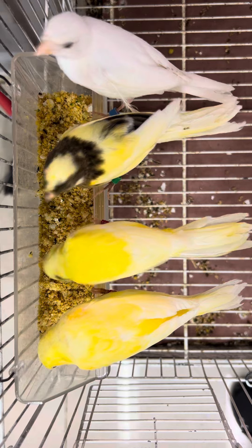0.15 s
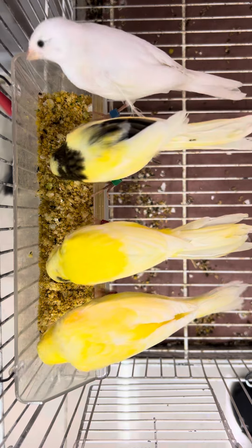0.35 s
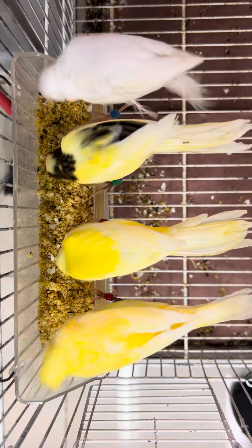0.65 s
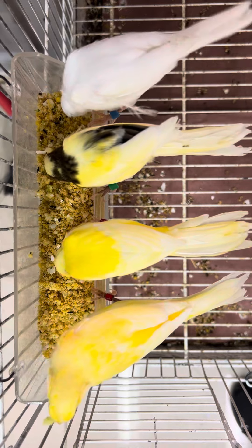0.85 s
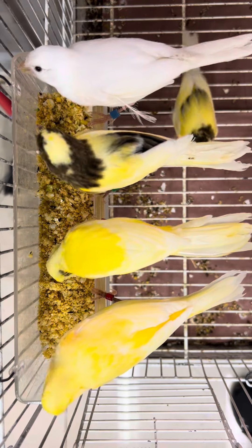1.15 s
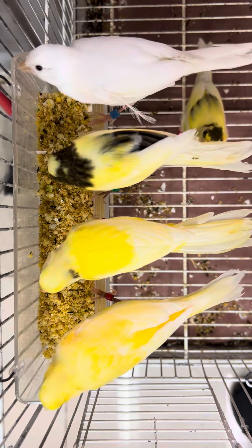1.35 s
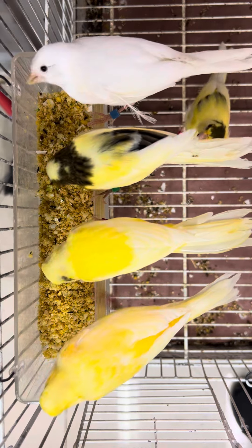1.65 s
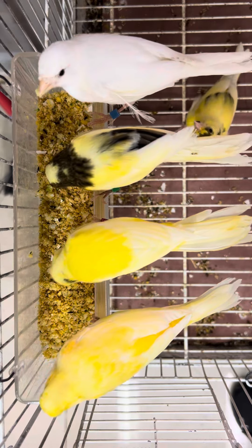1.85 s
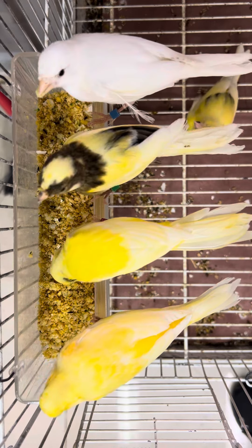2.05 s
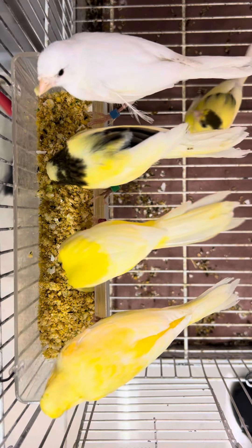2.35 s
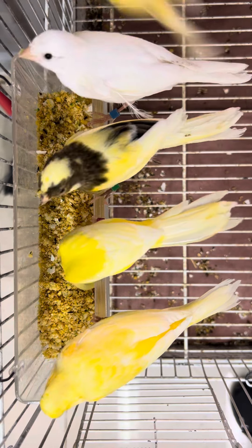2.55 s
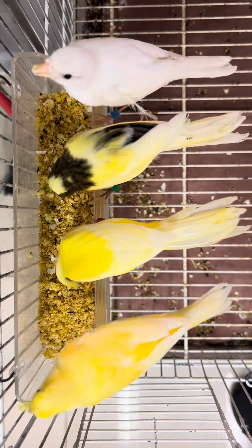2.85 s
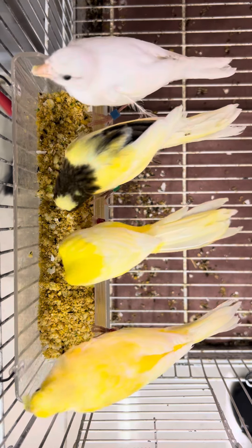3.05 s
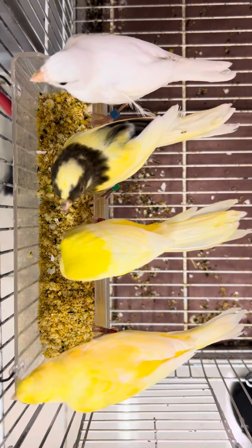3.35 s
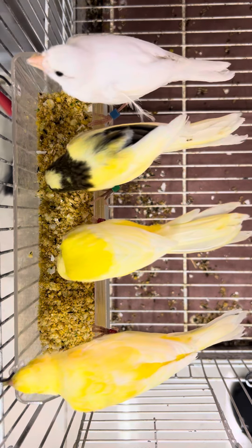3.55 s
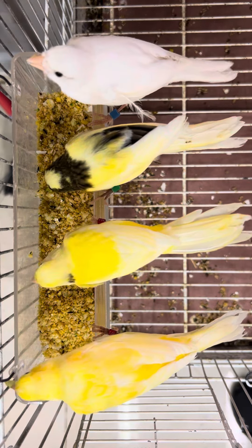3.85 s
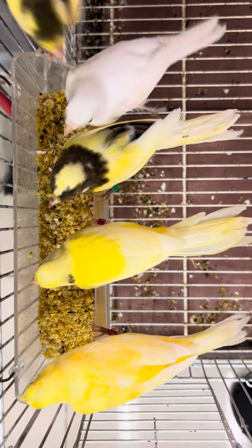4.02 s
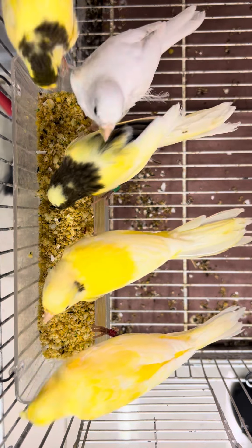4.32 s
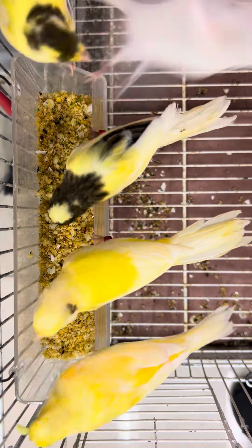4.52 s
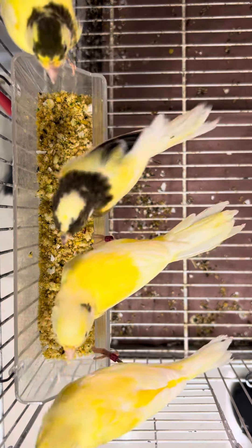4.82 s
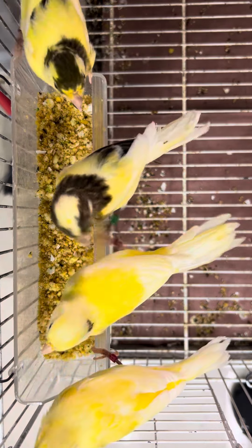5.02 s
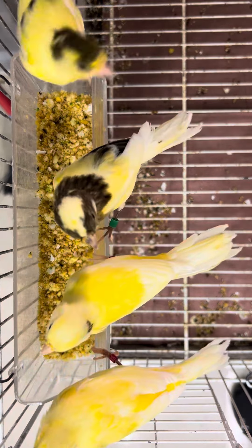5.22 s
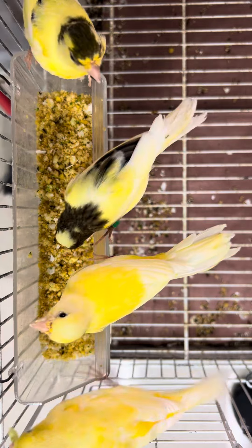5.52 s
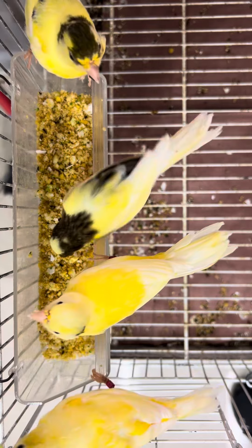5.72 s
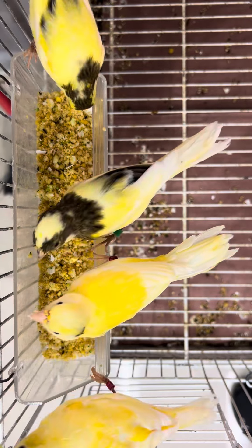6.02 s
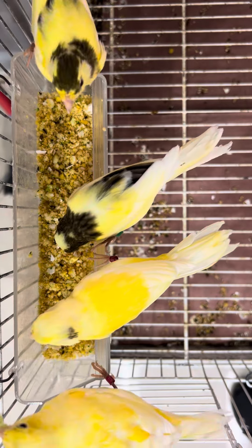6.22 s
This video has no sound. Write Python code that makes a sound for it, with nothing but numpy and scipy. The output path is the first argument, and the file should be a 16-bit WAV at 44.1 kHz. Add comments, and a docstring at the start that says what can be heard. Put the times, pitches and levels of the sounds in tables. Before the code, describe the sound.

Several canaries trill, chirp and buzz over one another in a small lively room, with wire cage rattles and a low appliance hum.

```python
"""Canaries sing over one another in a small, lively room, above an appliance's hum and far-off chirping.
First come chirps, buzzes, whistles and a far bird's peeps, and jolts soon begin to rattle the wire cage.
After a second one bird rolls rising sweeps that slow down and sink; near the end of these come close squeaks.
Then it rolls falling sweeps while feet shuffle on the wires, and a last jolt comes near the end.
Voices are gliding near-sines, knocks are bursts of noise, the wires are resonators, and echoes are added."""
import sys
import numpy as np
from scipy import signal
from scipy.fft import rfft, irfft
from scipy.io import wavfile
from scipy.ndimage import uniform_filter1d

SR = 44100
rng = np.random.default_rng(int(sys.argv[2]) if len(sys.argv) > 2 else 0)


def int16_out(signal):
    """Quantize to a 16-bit WAV file."""
    q = np.round(np.clip(np.atleast_2d(signal).T, -1, 1) * 32767)
    wavfile.write(sys.argv[1], SR, q.astype(np.int16))


N = 281358

# In all tables, levels are starting points that the sound functions shape further.
# Left-right is how much louder the left side is.
# room air, loudness over pitch: (frequency [Hz], relative level [dB per Hz])
AIR_SPECTRUM = [(22, -46), (32, -13.5), (60, 3.5), (91, -3.5), (173, -10), (421, -12), (700, -22.5),
                (1490, -30.5), (3000, -35), (6000, -40), (10000, -44), (15000, -87)]
# how wide the air sounds: (frequency [Hz], side against middle [dB])
AIR_WIDTH = [(60, -36), (125, -23), (250, -16), (500, -6.5), (1000, -3), (12000, -26)]
# narrow bands of the motor's hum: (centre [Hz], width [Hz], level [dB])
HUM_BANDS = [(80.9, 6.8, -36), (146.1, 2.8, -48.5), (221.8, 51, -48)]
# a far bird repeats one note: (time [s], level [dB])
FAR_PEEPS = [(0.076, -49), (.95, -46), (1.08, -49), (1.219, -47.5), (1.371, -45.5), (1.52, -46),
             (1.691, -44.5), (1.835, -45)]
# the cage is jolted: (time [s], level [dB], relative brightness [dB], rattle fade time [s])
CAGE_JOLTS = [(0.494, -21.5, -1.5, 0.0082), (0.562, -17.5, -11, 0.0058), (.702, -24, -3, 0.0033),
              (1.858, -18.5, -1, 0.0082), (4.086, -18.5, -34, 0.012), (4.205, -29, -22, 0.011),
              (4.46, -20, 0.5, 0.0084), (4.589, -31.5, -5, 0.027), (4.769, -25.5, -31, 0.01),
              (4.847, -35.5, -0.5, 0.036), (4.981, -25.5, -14, 0.0041), (5.112, -35, -3, 0.037),
              (6.318, -17.5, -9, 0.0053)]
# ringing cage wires: (pitch [Hz], level [dB], time to fade by 60 dB [s])
CAGE_WIRES = [(1046, -33.5, 0.15), (1140, -26.5, .08), (1253, -25.5, 0.096), (1400, -30, 0.055),
              (1550, -34.5, 0.097), (1737, -38, 0.058), (2010, -36, 0.17), (2280, -36, 0.087)]
# husks crack: (time [s], level [dB])
HUSK_CRACKS = [(2.673, -25.5), (3.203, -51), (3.434, -41), (4.3, -40)]
# harsh scolds and a rustle of feathers: (time [s], length [s], centre [Hz], width [Hz], level [dB])
SCOLDS = [(2.498, 0.042, 6470, 1220, -18.5), (6.035, 0.057, 6360, 1650, -23),
          (0.287, 0.025, 5200, 10000, -37.5)]
# wings beat the tray: (time [s], length [s], centre [Hz], width [Hz], level [dB])
WING_THUMPS = [(2.277, 0.11, 537, 287, -32), (3.708, 0.019, 990, 600, -42)]
# close squeaks: (time [s], length [s], edge pitch [Hz], top pitch [Hz], level [dB], left-right [dB])
SQUEAKS = [(3.891, 0.018, 1962, 2203, -19.5, 3), (4.061, 0.026, 1650, 3106, -14.5, 0.5),
           (4.46, 0.038, 2115, 3030, -20.5, 0)]
# strength of a squeak's harmonics, starting with the lowest: (level [dB])
SQUEAK_HARMONICS = [-10, -3, -14.5, -19.5]
# calls on both sides of the syrinx, the bird's voice box:
# (time [s], upper voice [Hz], sag of the lower voice [Hz], level [dB])
TWO_VOICED_CALLS = [(0.535, 6466, 406, -33.5), (1.454, 6590, 197, -33.5), (2.343, 6550, 39.8, -32),
                    (2.964, 6710, 147, -30.5), (4.424, 6510, 214, -31), (6.204, 6510, 446, -28)]
# raspy notes, mostly in short runs: (time [s], length [s], pitch [Hz], roughness [0-1], level [dB])
BUZZES = [(0.099, 0.079, 3395, 0.34, -47), (0.743, 0.021, 3810, 0.62, -31),
          (0.787, 0.014, 3770, 0.59, -27.5), (0.836, 0.026, 3796, 0.52, -26.5),
          (0.886, 0.019, 3793, 0.55, -30.5), (1.046, 0.012, 2846, 0.7, -43),
          (1.072, 0.039, 3435, 0.3, -32.5), (1.152, 0.014, 3476, 0.34, -26.5),
          (1.196, 0.016, 3730, 0.36, -30), (1.242, 0.025, 3630, 0.56, -32.5),
          (1.293, 0.021, 3600, 0.38, -31.5), (1.339, 0.037, 3546, 0.28, -32),
          (1.409, 0.025, 3640, 0.4, -30), (1.451, 0.012, 3594, 0.36, -32.5),
          (1.508, 0.044, 3306, 0.63, -35.5), (1.573, 0.049, 3785, 0.34, -38),
          (2.242, 0.016, 4680, 0.5, -31), (2.294, 0.048, 4730, 0.48, -32), (2.358, 0.029, 4580, 0.7, -27),
          (2.402, 0.038, 4780, 0.7, -31.5), (2.483, 0.025, 4714, 0.74, -26),
          (2.885, 0.031, 3590, 0.48, -28.5), (2.931, 0.026, 3825, 0.34, -26.5),
          (2.979, 0.014, 3595, 0.36, -31), (3.064, 0.022, 3550, 0.5, -29), (3.122, 0.01, 3600, 0.3, -28),
          (3.879, 0.018, 4746, 0.52, -30), (3.929, 0.034, 3486, 0.52, -30.5),
          (3.993, 0.016, 3610, 0.5, -30.5), (4.028, 0.032, 3718, 0.57, -30.5),
          (4.072, 0.012, 3864, 0.28, -26), (4.106, 0.057, 3846, 0.24, -31.5),
          (5.092, 0.027, 5770, 0.66, -52), (5.211, 0.042, 5065, 0.2, -31), (5.286, 0.015, 5540, 0.35, -38),
          (5.296, 0.028, 4710, 0.43, -31.5), (5.332, 0.041, 4810, 0.67, -32.5),
          (5.39, 0.023, 3330, 0.26, -41), (5.406, 0.019, 5390, 0.5, -35), (5.454, 0.038, 5090, 0.6, -41.5),
          (5.537, 0.03, 5200, 0.96, -35)]
# single chirps from all sides: (time [s], length [s], pitch [Hz], level [dB], left-right [dB])
SINGLE_CHIRPS = [(0.026, 0.026, 2120, -43, -2), (0.073, 0.015, 5490, -37, 2), (0.08, 0.014, 2710, -43.5, 0),
                 (0.218, 0.018, 2090, -50, 0), (0.278, 0.014, 2820, -46, 1), (.346, 0.011, 4540, -36, 0),
                 (0.348, 0.032, 2540, -50, 1), (0.415, 0.053, 2090, -50.5, 2), (1.485, 0.02, 4210, -28, 4),
                 (2.98, 0.048, 2608, -35.5, 1), (3.83, 0.031, 5580, -41.5, 2),
                 (0.859, 0.023, 5180, -39.5, 1), (2.09, 0.025, 5160, -30.5, 7),
                 (2.98, 0.015, 4870, -30.5, -2), (1.859, .025, 4430, -33, 0),
                 (2.233, 0.021, 5320, -28.5, -1), (2.296, .03, 5900, -44, 0), (2.597, 0.044, 5250, -36, -1),
                 (2.705, 0.12, 3350, -40, 1), (4.142, 0.035, 4864, -32.5, -2), (4.397, 0.04, 4765, -33, 2),
                 (5.191, 0.044, 4795, -32, 0)]
# chirps with a fainter upper voice just behind: (time [s], pitch [Hz], level [dB])
DOUBLE_CHIRPS = [(0.052, 4504, -33.5), (0.185, 4603, -25), (0.326, 4610, -29), (0.465, 4580, -27),
                 (0.984, 4710, -32), (3.261, 4526, -31), (3.416, 4560, -27.5), (5.826, 4330, -31.5)]
# held whistles: (time [s], length [s], pitch [Hz], level [dB], left-right [dB])
HELD_WHISTLES = [(.557, .138, 3470, -35.5, 1.2), (.986, .048, 2050, -47.8, 0),
                 (1.558, .088, 2370, -44.1, -2.7), (1.995, .225, 2775, -37, 5.8),
                 (2.575, .208, 2780, -38, 4.8), (3.86, .13, 2320, -42.1, 1.4),
                 (4.091, .058, 2565, -34.7, .7), (4.583, .188, 2780, -35.5, 5),
                 (5.154, .208, 2775, -35.5, 5.5)]
# a three-note tune:
# (delay [s], length [s], first pitch [Hz], last pitch [Hz], level [dB], left-right [dB])
TUNE_NOTES = [(0, .185, 2040, 2095, -42.5, .3), (.3, .214, 2440, 2435, -38, -3),
              (.544, .09, 2565, 2535, -44, 2)]
# when the tune is sung: (time [s])
TUNE_STARTS = [3.19, 5.661]
# falling sweeps onto one low note: (time [s], length [s], level [dB])
FALLING_SWEEPS = [(4.485, 0.025, -20.5), (4.575, 0.042, -17.5), (4.683, 0.043, -16.5), (4.788, 0.043, -19),
                  (4.901, 0.033, -19), (5.004, 0.047, -18), (5.113, 0.049, -22), (5.219, 0.047, -20),
                  (5.319, 0.054, -20), (5.442, .051, -20.5), (5.589, 0.11, -22.5), (5.778, 0.14, -21.5),
                  (5.99, 0.12, -21), (6.193, 0.11, -23)]
# rising sweeps of the same bird: (time [s], top pitch [Hz], level [dB])
RISING_SWEEPS = [(1.115, 5180, -27.5), (1.184, 5130, -30), (1.251, 5145, -26), (1.317, 5010, -29.5),
                 (1.386, 5025, -26.5), (1.452, 4965, -27.5), (1.521, 4940, -33), (1.594, 4905, -29.5),
                 (1.673, 5080, -27.5), (1.752, 4910, -28.5), (1.824, 4914, -26.5), (1.904, 4835, -24.5),
                 (1.992, 4830, -22.5), (2.089, 4894, -20.5), (2.221, 4807, -21.5), (2.366, 4816, -22.5),
                 (2.503, 4780, -21), (2.657, 4714, -24.5), (2.801, 4704, -22.5), (2.915, 4490, -26),
                 (3.069, 4468, -23), (3.271, 4158, -21), (3.529, 4286, -24), (3.755, 4203, -19),
                 (4.061, 4145, -24), (4.312, 4090, -22.5)]
# how the rising sweeps drift:
# (time [s], first pitch [Hz], bend exponent [-], share of the length spent gliding [-])
RISING_DRIFT = [(1.099, 4230, 0.67, 0.78), (1.3, 3890, 0.63, 0.38), (1.549, 3590, 0.53, 0.67),
                (2.1, 3464, 0.81, 0.59), (2.8, 3390, 0.63, 0.66), (3.07, 3500, 0.94, 0.36),
                (3.268, 3510, 0.58, 0.87), (3.519, 3150, 0.81, 0.82), (4.351, 3480, 0.79, 0.64)]
# phase shift between left and right over pitch: (frequency [Hz], lead of the left [rad])
LEFT_RIGHT_PHASE = [(3600, 0), (4400, 0.25), (5300, -1.48), (6500, -1), (11000, -1.11), (15500, -1.8)]

CHIRP_BEND = 0.8  # exponent of the glide; below 1 it moves fastest at the start
CAGE_PAN_DB = -0.5


def amp(db):
    """Turn decibels into a plain multiplier."""
    return 10 ** (np.asarray(db) / 20)


def rms_one(x):
    """Scale a sound to an average (RMS) strength of 1."""
    return x / np.sqrt(np.mean(x ** 2) + 1e-20)


def at_hz(points, hz):
    """Read a curve between its points, on a log-frequency axis."""
    point_hz, values = np.array(points).T
    return np.interp(np.log(hz), np.log(point_hz), values)


def spectrum_hz():
    """List the frequencies of a full-length spectrum, with no value below 1 Hz."""
    return np.maximum(np.arange(N // 2 + 1) * SR / N, 1)


def add(track, s, sound, pan_db):
    """Mix a sound into a stereo track; half the pan lifts the left, half lowers the right."""
    at = round(s * SR)
    sound = sound[:N - at]
    track[:, at:at + len(sound)] += sound * amp([[pan_db / 2], [-pan_db / 2]])


def band(x, hz, width_hz):
    """Pass a sound through one resonance with a peak gain of 1."""
    return signal.lfilter(*signal.iirpeak(hz, hz / width_hz, fs=SR), x)


def double_band(x, hz, width_hz):
    """Use the same resonance twice for steeper sides."""
    return band(band(x, hz, width_hz), hz, width_hz)


def wobble(rate_hz):
    """Smooth noise into a slow random drift of spread 1."""
    r = np.exp(-2 * np.pi * rate_hz / SR)
    return rms_one(signal.lfilter([1], [1, -2 * r, r * r], rng.standard_normal(N)))


def room(track, wet_db, side_db=-6):
    """Add a dense, dying cloud of reflections that differs left and right, more so in the treble."""
    t60_s, wall_cut_hz = 0.27, 9700
    t = np.arange(SR // 2) / SR
    decay = amp(-60 * t / t60_s) * (t > .003)
    mid, side = rng.standard_normal((2, len(t))) * decay
    side = amp(side_db) * side + amp(-8) * band(side, 16000, 4300)
    walls = signal.butter(1, wall_cut_hz, fs=SR, output="sos")
    cloud = signal.sosfilt(walls, mid + side * [[1], [-1]])
    cloud = cloud / np.sqrt(np.sum(cloud ** 2) / 2)
    return track + amp(wet_db) * signal.fftconvolve(track, cloud, axes=1)[:, :N]


def octaves_of(track):
    """Square the shared airway's sound, giving octaves and sums of notes that sound together."""
    strength = np.sqrt(np.abs(uniform_filter1d(track ** 2, size=256)))
    squared = track ** 2 / (strength + 1e-6)
    return signal.sosfilt(signal.butter(4, 3800, "high", fs=SR, output="sos"), squared)


def song(notes, swell, lead_s, lead_hz, octave_db, third_db, rough_hz, flutter_db, wet_db,
         hook_hz=0, hook_s=0.0099, rasp_ratio=0, glide_share=1, accent_db=0, arch_db=0, breath_db=-60):
    """Sing gliding near-sines; the membranes waver in pitch and strength.

    Each note: (time [s], length [s], first [Hz], last [Hz], bend or roughness, level [dB], optional pan [dB]).
    """
    track, thirds = np.zeros((2, N)), np.zeros((2, N))
    waver, flutter = wobble(130.0), wobble(74)
    notes = list(notes)
    shares = np.broadcast_to(glide_share, len(notes))
    for (s, length, first, last, column, db, *pan), share in zip(notes, shares):
        bend, rough = (1, column) if rasp_ratio else (column, 1)
        t = np.arange(round((lead_s + length + hook_s) * SR)) / SR - lead_s
        at = np.minimum(round(s * SR) + np.arange(len(t)), N - 1)
        u = np.clip(t / (share * length), 0, 1)  # progress of the glide

        hz = first + (last - first) * u ** bend + rough * rough_hz * waver[at]
        hz = hz + lead_hz * np.maximum(-t / lead_s, 0)  # the note fades in along its lead-in glide
        hz = hz + hook_hz * (np.maximum(t - length, 0) / hook_s) ** 0.704  # the end can hook up or down
        phase = 2 * np.pi * np.cumsum(hz) / SR

        fade_in = np.minimum(1 + t / lead_s, 1) ** 1.63
        fade_out = np.minimum((t[-1] - t) / hook_s * 0.62, 1)
        push = accent_db * np.exp(-(t / 0.021) ** 2)  # a push of breath starts the glide
        growth = swell * (u ** bend - 1.5)
        arch = arch_db * (np.sin(np.pi * u) - .5)
        level = db + growth + arch + flutter_db * np.tanh(flutter[at]) + push
        shape = amp(level) * fade_in * fade_out

        rasp = 1
        if rasp_ratio:  # a fast, uneven throb makes side tones above and below
            stumble = np.cumsum(0.164 * rng.standard_normal(len(t)))
            rasp = 1 + rough * amp(-1.5) * np.sin(rasp_ratio * phase + stumble)
        add(track, s - lead_s, shape * rasp * np.sin(phase), sum(pan))
        add(thirds, s - lead_s, shape * np.sin(3 * phase), sum(pan))
    # air rushes through the beak with every note
    breath = double_band(track * rng.standard_normal(N), 8700, 3500)
    voice = track + amp(breath_db) * breath
    voice = voice + amp(octave_db) * octaves_of(track) + amp(third_db) * thirds
    return room(voice, wet_db)


def background():
    """Mix room air, narrow noise bands of a motor's hum and a mains tone of drifting strength."""
    air_db, mains_hz, mains_db = -38, 121, -39.5
    hz = spectrum_hz()
    mid, side = rfft(rng.standard_normal((2, N))) * amp(at_hz(AIR_SPECTRUM, hz))
    side = side * amp(at_hz(AIR_WIDTH, hz))
    air = irfft(mid + side * [[1], [-1]], N)
    hum = 0
    for centre, width, db in HUM_BANDS:
        noise = rng.standard_normal(N + SR)
        settled = double_band(noise, centre, width)[SR:]  # skip the filter's slow start
        hum = hum + amp(db) * rms_one(settled)
    tone = np.sqrt(2) * np.sin(2 * np.pi * mains_hz * np.arange(N) / SR)
    mains = amp(mains_db + 1.7 * wobble(3.4)) * tone
    return amp(air_db) * rms_one(air) + hum + mains


def chatter(count):
    """List faint chirps of distant birds with random times, pitches and glides."""
    when, pitch, long, glide, loud, side = rng.random((count, 6)).T
    start = 0.015 + when * (N / SR - .1)
    length = np.interp(long, [0, 1], (.015, .05))
    hz = np.interp(pitch, [0, 1], (2000, 5800))
    last_hz = hz + 350 * (2 * glide - 1)
    db = -58 + 3 * (2 * loud - 1)
    return zip(start, length, hz, last_hz, [CHIRP_BEND] * count, db, 8 * (side - .5))


def far_peeps():
    """List one short note, repeated, that droops in pitch."""
    length_s, middle_hz, droop_hz = 0.038, 6053, 119
    first, last = middle_hz + droop_hz / 2, middle_hz - droop_hz / 2
    return [(s, length_s, first, last, CHIRP_BEND, db) for s, db in FAR_PEEPS]


def shuffle():
    """Feet on the wires make clumps of light contacts, heard through the body of the cage."""
    start_s, end_s, touches_per_s, level_db = 4.48, 5.25, 290, -54.5
    t = np.arange(N) / SR
    fades = np.clip(np.minimum(t - start_s, end_s - t) / 0.065, 0, 1)
    busy = fades * amp(5.2 * wobble(32))
    touches = rng.standard_normal(N) * (rng.random(N) < touches_per_s / SR)
    body = rms_one(band(band(touches, 930, 2800), 1100, 3100))
    track = np.zeros((2, N))
    add(track, 0, amp(level_db) * busy * body, CAGE_PAN_DB)
    return room(track, wet_db=2.5)


def cage():
    """Each jolt is a dying shower of contacts that rings the wires and is partly heard bare; husks crack."""
    track, t = np.zeros((2, N)), np.arange(SR // 3) / SR
    for s, db, bright, rattle in CAGE_JOLTS:
        contacts = rng.standard_normal(len(t)) * (rng.random(len(t)) < .16)
        shower = contacts * np.exp(-t / rattle) * np.minimum(t / 0.003, 1)
        ring = band(band(shower, 1530, 2940), 1490, 1530) * amp(17.5)
        for hz, mode_db, t60 in CAGE_WIRES:
            r = amp(-60 / (t60 * SR))
            w = 2 * np.pi * hz * (1 + .02 * rng.normal()) / SR  # wires vary a little from jolt to jolt
            wire = signal.lfilter([0, np.sin(w)], [1, -2 * r * np.cos(w), r * r], shower)
            ring += amp(mode_db + 4.7 * rng.normal()) * wire
        bare = amp(bright + 12.0) * band(shower, 3550, 2440)
        add(track, s, amp(db) * (ring + bare), CAGE_PAN_DB)
    for s, db in HUSK_CRACKS:
        crack = rng.standard_normal(200) * np.exp(-np.arange(200) / SR / 0.00068)
        add(track, s, amp(db) * band(crack, 5560, 11200), 0)
    return room(track, wet_db=0.0, side_db=-2.5)


def bursts():
    """Scolds, a feather rustle and wing thumps are noise bursts in one broad resonance."""
    track = np.zeros((2, N))
    for s, length, hz, width, db in SCOLDS + WING_THUMPS:
        u = np.linspace(0, 1, round(length * SR))
        noise = rms_one(double_band(rng.standard_normal(len(u)), hz, width))
        fades = np.clip(u / 0.29, 0, 1) * (1 - u) ** 2.4
        add(track, s, amp(db) * noise * fades, 0)
    return room(track, wet_db=7.0)


def squeaks():
    """Squeaks rise and fall in an arch, with shaky pitch and strong harmonics."""
    track = np.zeros((2, N))
    for s, length, edge, top, db, pan in SQUEAKS:
        arch = np.sin(np.linspace(0, np.pi, round(length * SR)))
        hz = edge + (top - edge) * arch + 400 * rng.standard_normal(len(arch))
        phase = 2 * np.pi * np.cumsum(hz) / SR
        tone = sum(amp(g) * np.sin((k + 1) * phase) for k, g in enumerate(SQUEAK_HARMONICS))
        add(track, s, amp(db) * arch ** 0.58 * tone, pan)
    return room(track, wet_db=-13)


def two_voiced():
    """List calls of two notes at once; the upper voice's fall is 208 Hz less, so it may rise instead."""
    length_s, low_hz, lift_hz, upper_db = .12, 5610, 208, -4.5
    low = [(s, length_s, low_hz, low_hz - sag, 1, db) for s, high, sag, db in TWO_VOICED_CALLS]
    upper = [(s, length_s, high, high + lift_hz - sag, 1, db + upper_db)
             for s, high, sag, db in TWO_VOICED_CALLS]
    return low + upper


def buzzes():
    """List raspy notes of level pitch; their roughness sets the waver and the throb."""
    return [(s, length, hz, hz, rough, db) for s, length, hz, rough, db in BUZZES]


def chirps():
    """List single chirps, and double ones whose fainter upper voice comes just behind."""
    lower_s, lower_rise_hz = 0.0278, 87.4
    upper_s, lag_s, ratio, upper_rise_hz, upper_db, upper_pan_db = 0.031, .012, 1.14, 123, -10, 3
    notes = [(s, length, hz, hz, CHIRP_BEND, db, pan) for s, length, hz, db, pan in SINGLE_CHIRPS]
    for s, hz, db in DOUBLE_CHIRPS:
        upper = ratio * hz
        notes.append((s, lower_s, hz - lower_rise_hz, hz, CHIRP_BEND, db))
        notes.append((s + lag_s, upper_s, upper, upper + upper_rise_hz, CHIRP_BEND,
                      db + upper_db, upper_pan_db))
    return notes


def whistles():
    """List held notes of level pitch and the tune, whose notes glide slightly."""
    tune = [(s + lag, length, first, last, 1, db, pan)
            for s in TUNE_STARTS for lag, length, first, last, db, pan in TUNE_NOTES]
    return tune + [(s, length, hz, hz, 1, db, pan) for s, length, hz, db, pan in HELD_WHISTLES]


def falling_roll():
    """List sweeps that drop to one low note; longer ones start higher and linger there."""
    landing_hz, span_hz = 3546, 2700  # span of a sweep 0.1 s long
    return [(s, length, landing_hz + span_hz * (10 * length) ** 0.41, landing_hz, 0.47 + 8.0 * length, db)
            for s, length, db in FALLING_SWEEPS]


def rising_roll():
    """List sweeps whose length follows the tempo, while first pitch, bend and glide share drift."""
    s, top, db = np.transpose(RISING_SWEEPS)
    at, first, bend, share = np.transpose(RISING_DRIFT)
    length = np.append(.62 * np.diff(s), 0.065)  # a share of the wait for the next; the last in seconds
    notes = zip(s, length, np.interp(s, at, first), top, np.interp(s, at, bend), db)
    return notes, np.interp(s, at, share)


def scene():
    """Mix all birds, the cage and the background."""
    birds = song(chatter(count=130), swell=.1, lead_s=0.0088, lead_hz=-100, octave_db=-38, third_db=-34,
                 rough_hz=38.8, flutter_db=13.0, wet_db=6.0)
    birds += song(far_peeps(), swell=.1, lead_s=.015, lead_hz=-250, octave_db=-28, third_db=-45,
                  rough_hz=70, flutter_db=4.5, wet_db=4, hook_s=.02)
    birds += song(two_voiced(), swell=0.11, lead_s=0.013, lead_hz=0, octave_db=-20.0, third_db=-42,
                  rough_hz=66.0, flutter_db=1.5, wet_db=-0.5, breath_db=-18)
    # the long lead-in from below makes each buzz scoop upward
    birds += song(buzzes(), swell=0.069, lead_s=.012, lead_hz=-1400, octave_db=-23.5, third_db=-27,
                  rough_hz=191, flutter_db=3, wet_db=1.0, hook_s=0.0075, rasp_ratio=.17, breath_db=-16)
    birds += song(chirps(), swell=0.44, lead_s=0.0074, lead_hz=-320, octave_db=-14.5, third_db=-38,
                  rough_hz=25.3, flutter_db=3.0, wet_db=-3.5, hook_hz=-350, hook_s=0.027, breath_db=-18)
    birds += song(whistles(), swell=0.048, lead_s=0.0096, lead_hz=0, octave_db=-44, third_db=-32,
                  rough_hz=4, flutter_db=1.5, wet_db=-12, arch_db=9, hook_s=0.025)
    birds += song(falling_roll(), swell=12.3, lead_s=.014, lead_hz=472, octave_db=-21.5, third_db=-26.5,
                  rough_hz=25, flutter_db=3.5, wet_db=6.0, hook_hz=430, hook_s=0.0055, breath_db=-28)
    rises, shares = rising_roll()
    birds += song(rises, swell=14.0, lead_s=0.012, lead_hz=-500, octave_db=-24.5, third_db=-32.5,
                  rough_hz=30, flutter_db=-2.5, wet_db=5.5, hook_hz=-86, glide_share=shares,
                  accent_db=2.5, breath_db=-31)
    return background() + shuffle() + cage() + bursts() + squeaks() + birds


def record(dry):
    """A treble band is lifted, the top lowered, left and right shifted in phase, the highest pitches removed."""
    shelf_hz, shelf_db, cutoff_hz = 11600, -1.4, 16750
    bright = dry + amp(7.5) * band(dry, 10310, 1920)  # the resonance is added on top of the plain sound
    below = signal.sosfilt(signal.butter(10, shelf_hz, fs=SR, output="sos"), bright)
    above = signal.sosfilt(signal.butter(10, shelf_hz, "high", fs=SR, output="sos"), bright)
    stepped = below + amp(shelf_db) * above
    turn = at_hz(LEFT_RIGHT_PHASE, spectrum_hz()) / 2  # half the shift for each side
    shifted = irfft(rfft(stepped) * np.exp(1j * turn * [[1], [-1]]), N)
    return signal.sosfilt(signal.cheby2(12, 70, cutoff_hz, fs=SR, output="sos"), shifted)


dry = scene()
out = record(dry)
int16_out(out)
```